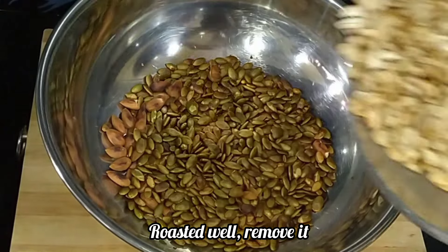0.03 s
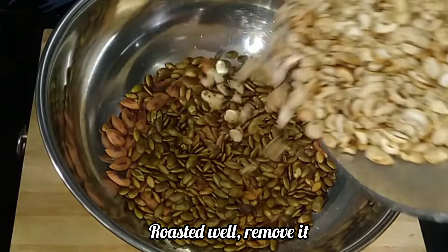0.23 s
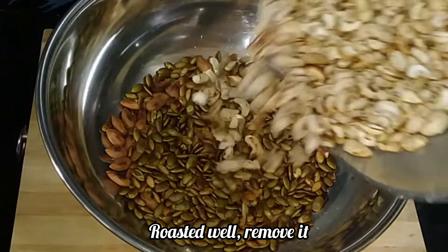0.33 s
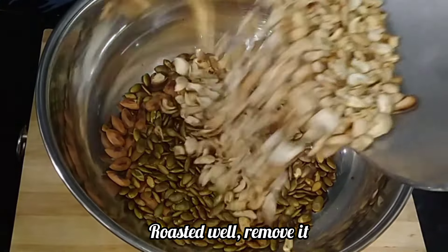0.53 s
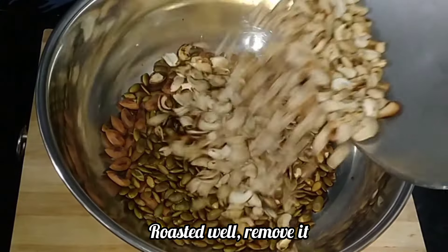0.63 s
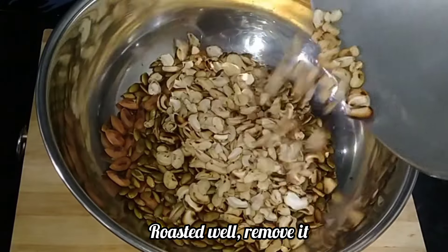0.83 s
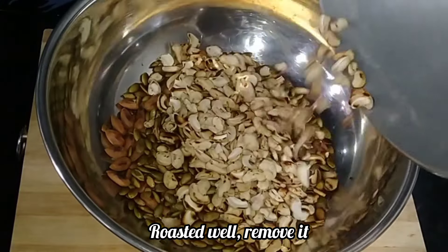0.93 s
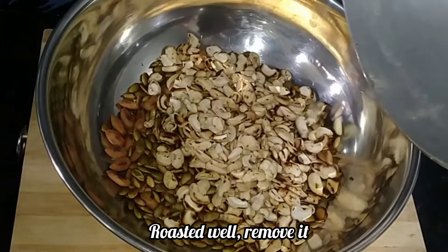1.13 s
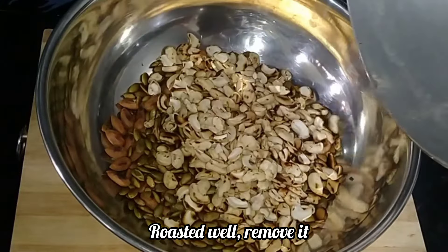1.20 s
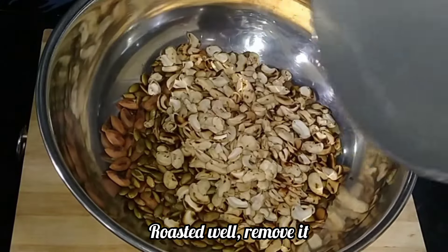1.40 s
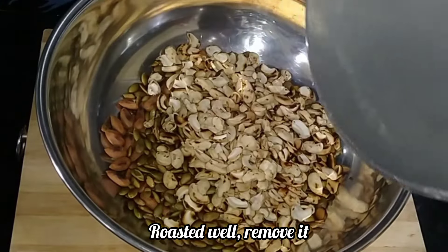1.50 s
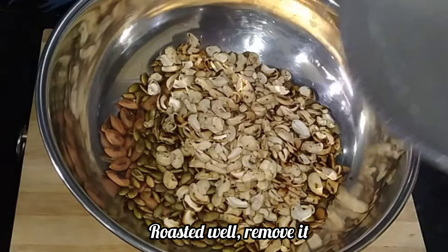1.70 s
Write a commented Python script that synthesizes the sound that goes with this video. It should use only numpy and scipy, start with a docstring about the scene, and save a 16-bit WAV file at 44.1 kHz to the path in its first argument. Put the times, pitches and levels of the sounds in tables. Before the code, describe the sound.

Dry seeds rattle into a steel bowl close by, starting with a sharp tick and pouring from about 0.25 seconds. The pan clinks and knocks on the bowl, ringing briefly, strongest near 0.5 and 0.8 seconds. The pour thins by 1.3 seconds, leaving single ticks until 1.7. A kitchen fan hums softly throughout, and two very faint, distant bird whistles come near 0.9 and 1.5 seconds.

```python
"""Roasted seeds into a steel bowl

A kitchen, one microphone close to the bowl. Dry roasted seeds slide from a pan onto a heap of seeds,
thousands of tiny impacts. Tipped and shaken, the pan clinks and knocks on the bowl and both ring;
a few last seeds tick. A fan hums throughout. Far off, probably a bird outside, two faint whistles."""
import sys
import numpy as np
from scipy import signal
from scipy.io import wavfile
from scipy.ndimage import uniform_filter1d

SR = 44100
rng = np.random.default_rng(int(sys.argv[2]) if len(sys.argv) > 2 else 0)


def master(y):
    """Save y as 16-bit WAV."""
    cut = np.clip(np.atleast_2d(y).T, -1, 1)
    pcm = np.round(cut * 32767)  # scale
    wavfile.write(sys.argv[1], SR, pcm.astype(np.int16))


N = 77175
EDGE_HZ = 15850  # top of the band


def amp(db):
    """Decibels to gain."""
    return 10 ** (np.asarray(db) / 20)


def unit(x):
    """Scales to rms 1."""
    return x / np.sqrt(np.mean(x ** 2) + 1e-20)


def clock(size=N):
    """Time in seconds."""
    return np.arange(size) / SR


def fade(t60, rise=0):
    """An envelope that swells and dies away."""
    t = clock()
    return np.exp(-np.log(1000) * t / max(t60, 1e-4)) * (1 - np.exp(-t / max(rise, 1e-5)))


def add(mix, start, sound):
    """Mixes a sound in at a time in seconds."""
    part = mix[max(round(start * SR), 0):]
    part += sound[:len(part)]


def colour(x, points, size=2048):
    """Causal filter of unit energy, shaped by (f/Hz, level/dB) points."""
    f, db = np.transpose(points)
    hz = abs(np.fft.fftfreq(size, 1 / SR))
    log_gain = np.log(amp(np.interp(np.log(hz + 1), np.log(f), db)))
    taps = np.fft.ifft(np.exp(signal.hilbert(log_gain).conj())).real[:size // 2]
    return signal.oaconvolve(x, taps / np.linalg.norm(taps))[:N]


def ring(pitches, levels, decays, size=24000):
    """Dying modes of struck metal, starting at rms 1."""
    t = clock(size)
    sound = sum(amp(db - 60 * t / t60) * np.sin(2 * np.pi * (hz * t + rng.random()))
                for hz, db, t60 in zip(pitches, levels, decays))
    return np.pad(sound, (0, N - size)) / np.sqrt(np.sum(amp(levels) ** 2) / 2)


def convolve(x, response):
    """Passes a sound through a response scaled to unit energy."""
    return signal.fftconvolve(x, response / np.linalg.norm(response))[:N]


def echo(x, t60, rise):
    """A diffuse tail of reflections."""
    return convolve(x, rng.standard_normal(N) * fade(t60, rise))


# fan tones: f/Hz, level/dB
FAN_TONES = [(40, -61), (105, -54), (210, -68.5)]
# spectrum of the moving air: f/Hz, level/dB
AIR_SPECTRUM = [(20, -4), (40, 7.5), (60, 8), (85, 5), (140, -4.5), (200, -5), (280, -14), (440, -9),
                (540, -3), (720, -11), (1300, -11), (2500, -22.5), (4500, -34), (9000, -42.5), (16000, -47)]


def fan(air_db=-54, waver=0.082, size=3000):
    """Room tone of the kitchen: a fan's wavering hum over a soft rush of air."""
    def drift():
        return unit(uniform_filter1d(uniform_filter1d(rng.standard_normal(N), size), size))
    hum = np.zeros(N)
    for hz, db in FAN_TONES:
        level = amp(db) * np.sqrt(2) * (1 + waver * drift())
        hum += level * np.sin(2 * np.pi * hz * clock() + 0.52 * drift())
    return hum + amp(air_db) * colour(rng.standard_normal(N), AIR_SPECTRUM, size=8192)


# modes of the bowl, a list each: f/Hz, level/dB, t60/s
BOWL_HZ = [291, 899, 1098, 1156, 1660, 1746, 2193, 2280, 2666, 2822, 3592, 4358, 4700, 7568]
BOWL_DB = [-7.5, -0.5, 2, -1.5, -4.5, -11.5, 2.5, -8, -5.5, -3.5, -1, 1.5, -1, -4.5]
BOWL_T60_S = [.15, 0.24, 0.19, 0.18, 0.26, 0.25, 0.084, 0.57, 0.15, .15, 0.16, 0.086, 0.15, .25]


def bowl_ring():
    """The steel bowl rings when seeds or pan strike it."""
    return ring(BOWL_HZ, BOWL_DB, BOWL_T60_S)


# bright rattle of the sliding seeds: t/s, level/dB
RATTLE_LEVELS = [(0, -54.5), (.12, -63), (0.231, -69), (0.242, -43), (.32, -47.5), (.42, -43), (.53, -42),
                 (.6, -49.5), (.66, -48), (.72, -50.5), (.86, -54), (.95, -54.5), (1.06, -52.5),
                 (1.15, -54.5), (1.22, -63), (1.29, -82), (1.451, -65), (1.75, -84)]
# its spectrum: f/Hz, level/dB
RATTLE_SPECTRUM = [(200, -21), (600, -10.5), (1300, 1), (2400, 6), (4000, 3.5), (6000, -3), (8200, 6),
                   (11000, 0), (13000, 0), (15500, 5.5)]
# dull patter on the heap: t/s, level/dB
PATTER_LEVELS = [(.24, -93), (.42, -66), (.55, -53.5), (.7, -53.5), (.9, -54.5), (1.1, -62.5), (1.2, -56),
                 (1.3, -70.5)]
# its spectrum: f/Hz, level/dB
PATTER_SPECTRUM = [(60, -22.5), (180, 4.5), (300, -4.5), (600, -4.5), (1200, -1.5), (2000, -7.5),
                   (4000, -16), (12000, -33.5)]


def seed_stream(seeds_per_s=2800, spread_db=2, t60=0.0051, bowl_db=-13.5, pitches=32, size=512):
    """The pour, close up: each impact is a click with a short pitched ring; the bowl rings beneath."""
    impacts, t, decay = np.zeros(N), clock(size), fade(t60)[:size]
    for hz in np.linspace(800, EDGE_HZ, pitches):
        strength = amp(spread_db * np.minimum(rng.exponential(1, N), 4)) * rng.choice([-1, 1], N)
        hits = strength * (rng.random(N) < seeds_per_s / pitches / SR)
        grain = decay * np.sin(2 * np.pi * hz * t) + 0.59 * decay ** 2 * rng.standard_normal(size)
        impacts += signal.oaconvolve(hits, grain)[:N]
    rattle = unit(colour(impacts, RATTLE_SPECTRUM)) * amp(np.interp(clock(), *np.transpose(RATTLE_LEVELS)))
    patter = unit(colour(impacts, PATTER_SPECTRUM)) * amp(np.interp(clock(), *np.transpose(PATTER_LEVELS)))
    return rattle + patter + amp(bowl_db) * convolve(rattle, bowl_ring())


# single seeds: t/s, level/dB, f/Hz, ring re snap/dB
SEED_TICKS = [(0.103, -21.5, 8460, -9), (0.306, -34, 3170, 9), (.9815, -49, 9400, 11),
              (1.0313, -33.5, 9100, -11), (1.12, -42, 11900, -5), (1.194, -35.5, 3600, -15),
              (1.242, -43.5, 8600, 15), (1.26, -36.5, 11100, -4.5), (1.337, -42, 8940, -2),
              (1.4735, -45, 8440, -4), (1.6928, -45.5, 11000, -3.5)]
# spectrum of a snap: f/Hz, level/dB
SNAP_SPECTRUM = [(300, -56), (2500, -13), (5000, -7), (8000, 0), (11000, -3), (15500, 6.5)]


def seed_ticks(snap_t60=0.0059, ring_t60=0.0057):
    """Lone seeds, nearest the microphone, snap and ring for a few milliseconds."""
    out = np.zeros(N)
    for start, db, hz, ring_db in SEED_TICKS:
        snap = colour(rng.standard_normal(N) * fade(snap_t60), SNAP_SPECTRUM)
        ping = amp(ring_db) * fade(ring_t60) * np.sin(2 * np.pi * hz * clock())
        add(out, start, amp(db) * (snap + ping))
    return out


# bright clinks on the steel: t/s, level/dB, t60/s
CLINKS = [(0.2409, -26.5, 0.013), (0.2508, -33, 0.041), (0.2615, -33, .03), (0.2689, -17.5, 0.067),
          (0.3453, -38, 0.042), (0.3738, -37, .03), (0.3914, -30, 0.027), (0.394, -54.5, .03),
          (0.4057, -33, 0.021), (0.4586, -46, 0.059)]
# spectrum of a contact: f/Hz, level/dB
CLINK_SPECTRUM = [(300, -28), (1500, -15), (2600, -7), (4300, -14.5), (5700, -2.5), (6500, -7.5),
                  (8200, 3.5), (9500, -3.5), (12000, -8.5), (16000, -14)]
# high modes of the rim, a list each: f/Hz, level/dB, t60/s
RIM_HZ = [2369, 3090, 5657, 7142, 7296, 7698, 8097, 8181, 8240, 8485, 8614, 11856]
RIM_DB = [-17.5, -7.5, 0.5, -12, -10.5, -16, -5, 1, -1.5, -11.5, 2.5, -8]
RIM_T60_S = [0.42, 0.098, .11, .1, .12, .15, 0.16, 0.091, .13, 0.051, 0.17, .18]


def rim_clinks(ring_db=-6):
    """Hard, light contacts wake only the high modes of the steel; longer ones ring louder."""
    out, steel = np.zeros(N), ring(RIM_HZ, RIM_DB, RIM_T60_S)
    longest = max(t60 for _, _, t60 in CLINKS)
    for start, db, t60 in CLINKS:
        contact = colour(rng.standard_normal(N) * fade(t60), CLINK_SPECTRUM)
        add(out, start, amp(db) * (contact + amp(ring_db) * steel * (t60 / longest) ** 2))
    return out


# pan on bowl: t/s, clatter/dB, treble gain/dB, swell/s, clatter t60/s, bowl ring/dB, pan ring/dB
KNOCKS = [(.2412, -34, -23, 0.00033, 0.05, -46, -56), (.3435, -42, 16, 0.00051, 0.048, -69, -58),
          (.4678, -28, -9, 0.00035, 0.018, -76, -63), (.4769, -21.5, -1, 0.00065, 0.092, -28.5, -37),
          (.543, -39, 9, 0.0014, 0.085, -67, -48), (.7735, -23.5, -35, 0.0014, 0.047, -37.5, -37),
          (.8137, -30.5, 9, 0.0035, 0.075, -58, -34.5), (1.035, -48, -2.5, 0.0065, 0.12, -55.5, -52.5)]
# spectrum of the clatter: f/Hz, level/dB
CLATTER_SPECTRUM = [(50, -34.5), (150, -13), (280, -7.5), (480, -16.5), (900, -3), (1400, -6.5),
                    (2300, -2.5), (3900, -13.5), (5500, -14), (8000, -9.5), (11000, -21), (16000, -28.5)]
# modes of the pan, a list each: f/Hz, level/dB, t60/s
PAN_HZ = [1122, 1608, 2160, 2410, 2706, 4382, 6285, 7390, 7690, 8130, 8445]
PAN_DB = [-3.5, -6.5, 2, -3, -4.5, -5.5, -3, -17.5, -11.5, -3.5, -2]
PAN_T60_S = [0.21, 0.26, 0.16, 0.06, .35, 0.23, 0.12, .12, 0.35, 0.27, 0.11]


def pan_knocks(treble_hz=3700, chatter_db=-2, touching_t60=0.26):
    """The pan chatters on the bowl, driving the modes of both: damped in contact, then ringing freely."""
    out = np.zeros(N)
    for start, db, treble_db, swell, t60, bowl_db, pan_db in KNOCKS:
        contacts = rng.standard_normal(N) * fade(t60, swell)
        clatter = amp(db) * colour(contacts, CLATTER_SPECTRUM)
        low = signal.lfilter(*signal.butter(2, treble_hz, fs=SR), clatter)
        high = signal.lfilter(*signal.butter(2, treble_hz, "high", fs=SR), clatter)
        metal = amp(bowl_db) * bowl_ring() + amp(pan_db) * ring(PAN_HZ, PAN_DB, PAN_T60_S)
        chatter = amp(chatter_db) * convolve(metal * fade(touching_t60), contacts)
        free_ring = metal * (1 - np.exp(-clock() / swell))
        add(out, start, 0.92 * (low - amp(treble_db) * high) + chatter + free_ring)
    return out


# skidding clumps: t/s, level/dB, t60/s
SKIDS = [(0.6223, -32, 0.099), (0.733, -31.5, 0.028), (0.764, -34.5, 0.099), (0.94, -38, 0.034),
         (0.9721, -32.5, 0.045), (1.153, -36, 0.044)]
# spectrum of their rasp: f/Hz, level/dB
SKID_SPECTRUM = [(500, -19), (2500, -16), (4000, -21), (5500, -6), (8000, -8), (10000, -17), (16000, -13.5)]


def seed_skids():
    """Clumps of seeds rasp briefly down the metal wall."""
    out = np.zeros(N)
    for start, db, t60 in SKIDS:
        add(out, start, amp(db) * rng.standard_normal(N) * fade(t60, rise=0.0016))
    return colour(out, SKID_SPECTRUM)


# falling whistle: t/s, level before the echoes/dB
FALLING_CALLS = [(1.461, -51.5)]


def bird(held_at_s=0.875, held_hz=2543, top_hz=3550, end_hz=2430, fall_s=0.023):
    """Far from the microphone, heard mostly as echoes: a held note, later a falling whistle."""
    def arch(seconds):
        return np.sqrt(abs(np.sin(np.pi * np.minimum(t / seconds, 1))))
    out, t = np.zeros(N), clock()
    held = arch(0.12) * np.sin(2 * np.pi * held_hz * t)
    add(out, held_at_s, amp(-54.5) * held)
    rasp = 1 + 0.22 * unit(uniform_filter1d(rng.standard_normal(N), size=40))
    pitch = end_hz + (top_hz - end_hz) * np.exp(-t / fall_s) * rasp
    phase = 2 * np.pi * np.cumsum(pitch) / SR
    call = arch(0.073) * (np.sin(phase) + amp(-18.5) * np.sin(2 * phase))
    for start, db in FALLING_CALLS:
        add(out, start, amp(db) * call)
    return 0.4 * out + 0.99 * echo(out, t60=0.052, rise=0.0011) + echo(out, t60=0.65, rise=0.003)


def scene():
    """At the microphone: the bowl reflects the seed impacts at once; the kitchen adds a short tail."""
    contacts = pan_knocks() + rim_clinks() + seed_skids()
    stream, ticks = seed_stream(), seed_ticks()
    near = contacts + stream + amp(-9) * echo(stream + ticks, t60=0.061, rise=0.0045)
    into_room = near + amp(-4.5) * ticks  # lone seeds lie nearer, so sound drier
    room = amp(-10) * echo(into_room, t60=0.5, rise=0.0043)
    return (near + ticks + room + bird() + fan())[None]


def record(dry):
    """The recorder's band limit."""
    lowpass = signal.firwin(511, EDGE_HZ, window=("kaiser", 9), fs=SR)
    return signal.oaconvolve(dry, lowpass[None], "same")


dry = scene()
out = record(dry)
master(out)
```